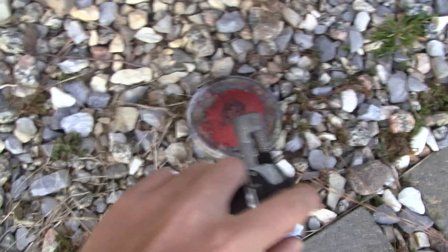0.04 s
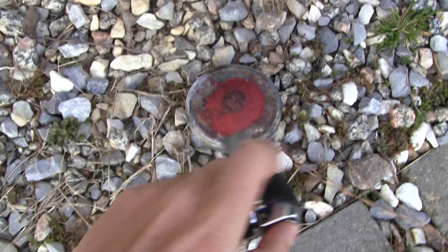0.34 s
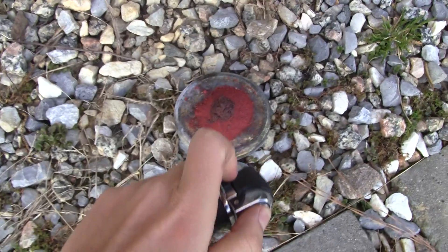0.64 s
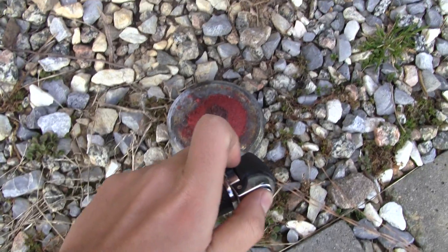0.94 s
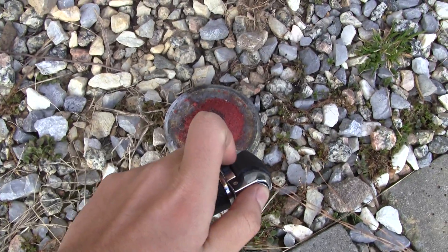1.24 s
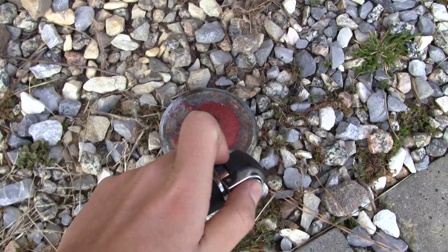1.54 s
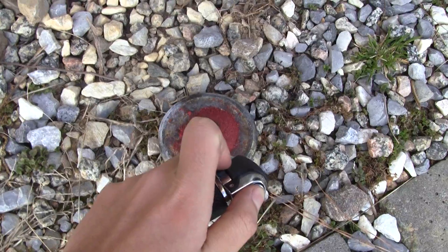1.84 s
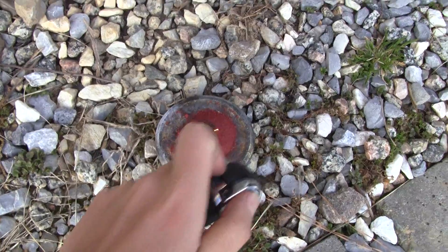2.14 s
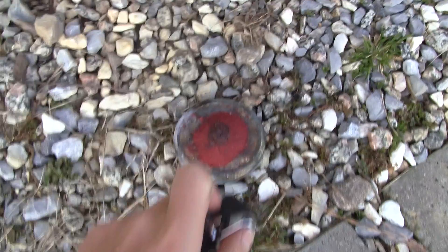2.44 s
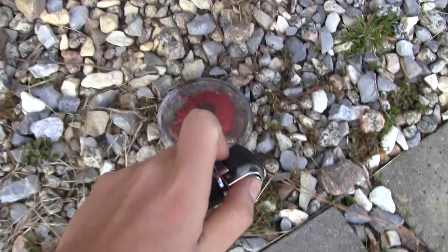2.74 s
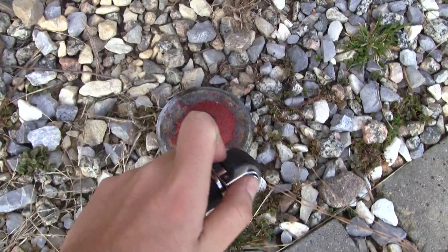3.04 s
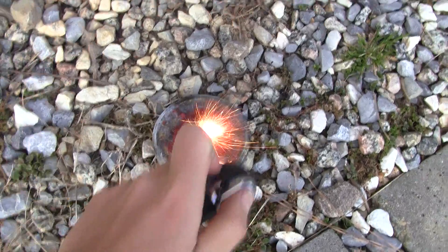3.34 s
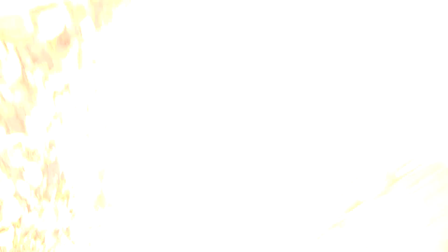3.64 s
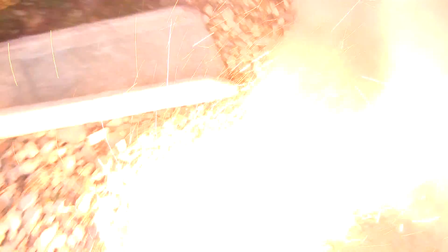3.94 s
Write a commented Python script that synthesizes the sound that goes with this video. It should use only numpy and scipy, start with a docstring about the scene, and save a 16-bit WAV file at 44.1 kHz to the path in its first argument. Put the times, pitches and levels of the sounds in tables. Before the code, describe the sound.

A loud hissing roar of burning powder erupts outdoors after a lighter rumbles and clicks.

```python
"""The low, fluttering rumble of a jet lighter's flame comes first, with its thin hiss, ticks and clicks.
The hiss is turbulent gas, its treble swept by a ground reflection. After dull bumps and a hollow
knock, a small dish of thermite powder on gravel outdoors, near the microphone, spits, catches with a roar
and burns on as a bright jet, crackling as single grains burst. One sharp pop makes the limiter duck."""
import sys
import numpy as np
from scipy import signal
from scipy.fft import rfft, irfft, next_fast_len
from scipy.io import wavfile
from scipy.ndimage import map_coordinates

SR = 44100
rng = np.random.default_rng(int(sys.argv[2]) if len(sys.argv) > 2 else 0)


def waveform_to_disk(signal):
    """Save audio, clipped to [-1, 1], as 16-bit WAV at the path in sys.argv[1]."""
    frames = np.transpose(np.atleast_2d(signal))
    scaled = np.clip(frames, -1, 1) * 32767
    samples = np.round(scaled).astype(np.int16)
    wavfile.write(sys.argv[1], SR, samples)


N = 176400
T = np.arange(N) / SR

# Spectra of the sources. Each row: frequency in Hz, relative level in dB.
RUMBLE_SPECTRUM = [(25, -33), (50, -20), (80, -14), (110, -7), (150, -7), (180, -4), (350, -1.5),
                   (450, -0.5), (580, -3), (860, -7), (1070, -8.5), (1330, -19), (1850, -19), (2250, -29),
                   (2900, -32), (3600, -40), (16000, -62)]
HISS_SPECTRUM = [(1500, -16), (3500, -13), (5000, -8), (5600, -4), (7000, -4), (8300, 3), (10300, 3.5),
                 (11500, -3), (13000, -9), (16000, -20)]
TICK_SPECTRUM = [(800, -15), (2500, -4), (4500, 0), (6000, -2), (8000, -10), (16000, -18)]
SPUTTER_SPECTRUM = [(800, -20), (1800, 2), (2300, -3), (3000, 0), (3900, -13), (5800, -9), (7500, -22),
                    (16000, -35)]
CLICK_SPECTRUM = [(500, -28), (1300, -18), (1800, 0), (2900, 1), (3800, -2), (4800, -11), (5600, 0),
                  (7500, -1.5), (9500, 2), (12500, -2.5), (16000, -14.5)]
FLARE_SPECTRUM = [(47, -48), (80, -24), (146, -8.5), (186, -12), (237, -4.5), (303, -8.5), (346, -1.5),
                  (422, -8), (451, -4.5), (575, -2.5), (734, -9.5), (1070, -5), (1460, -18), (1860, -1),
                  (2040, -10), (2660, -7.5), (2900, -9), (3620, -10.5), (4520, -14.5), (6170, -10.5),
                  (7200, -10.5), (9610, -2.5), (11200, -4), (13100, -6), (16000, -20.5)]  # while the powder catches
BURN_SPECTRUM = [(47, -51), (80, -16), (146, -6.5), (178, -9), (248, -3), (323, -8.5), (395, -2),
                 (515, -6.5), (629, -0.5), (917, -5), (1120, 0.5), (1670, -11), (2040, -4.5), (2780, -3),
                 (3100, -4), (3790, -0.5), (4830, -0.5), (7200, -6.5), (11000, -1.5), (14600, -9.5),
                 (16000, -15)]  # once the whole dish burns
POP_SPECTRUM = [(200, -15), (900, 9), (2000, 4), (4000, 2), (8000, 4), (16000, -7)]
# A wide and a narrow stereo image. Each row: frequency in Hz, side minus mid in dB.
WIDE_IMAGE = [(40, -11), (120, -10), (300, -15), (900, -16), (3000, -8), (4400, -20), (6000, -13),
              (9000, -11), (13000, -4)]
NARROW_IMAGE = [(100, -14), (400, -22), (1000, -29), (1700, -50), (4700, -50), (5500, -28), (8000, -14),
                (11000, -9), (15000, -7)]
# Envelopes of the lighter's rumble and hiss. Each row: time in seconds, relative level in dB.
RUMBLE_ENVELOPE = [(0.0, -46.5), (0.49, -45.5), (0.53, -48), (0.54, -44), (1.27, -45), (1.42, -42.5),
                   (1.57, -45.5), (1.99, -40), (2.43, -44), (2.44, -51.5), (2.51, -41.5), (2.98, -42.5),
                   (3.04, -37.5), (3.05, -49), (3.1, -39.5), (3.17, -40)]
HISS_ENVELOPE = [(0, -59), (.3, -58.5), (.55, -61.5), (1.5, -62.5), (1.9, -60), (2.3, -58), (2.6, -60),
                 (3.3, -61)]
# Faint hums. Each row: frequency in Hz, envelope as above.
FAINT_HUMS = [(112, [(0, -68), (2.1, -58), (2.28, -49), (2.4, -46), (2.55, -58), (2.66, -57), (2.75, -46),
              (2.95, -48), (3.3, -50), (4, -56)]), (448, [(0, -55), (.3, -52), (1.0, -55), (1.3, -68)])]
# Narrow bands in the hiss. Each row: centre in Hz, width in Hz, envelope as above.
WHISTLES = [(1310, 260, [(0, -54), (.35, -52), (.5, -66), (3.3, -72)]), (1800, 380, [(0, -70), (.65, -65),
            (1.2, -57), (2.2, -57), (2.44, -68), (2.55, -56), (3.3, -58)]), (4435, 240, [(0, -58),
            (.3, -58.5), (.39, -71), (.55, -62), (1.1, -58), (1.7, -59.5), (2.2, -63), (2.5, -69),
            (2.9, -61), (3.3, -62)]), (10000, 530, [(0, -62), (.5, -62), (1.0, -58), (1.5, -59), (1.7, -66),
            (2.5, -61), (2.8, -57.5), (3.3, -61)]), (9570, 700, [(0, -75), (1.5, -74), (1.7, -60),
            (2.1, -54.5), (2.35, -69), (2.8, -65), (3.0, -57.5), (3.3, -53)])]
# Lag of the ground reflection as the hand moves. Each row: time in seconds, delay in ms.
GROUND_DELAY = [(0, 1.29), (.27, 1.3), (.48, 1.21), (1.4, 1.195), (1.65, 1.23), (2.18, 1.235), (2.46, 1.38),
                (2.85, 1.2), (3.3, 1.23)]
# Sputters of the gas jet. Each row: start in seconds, length in seconds, level in dB.
JET_SPUTTERS = [(.555, .055, -60), (.725, .095, -53), (.86, .035, -59), (1.038, .04, -57),
                (1.115, .05, -61), (1.268, .08, -58), (1.735, .04, -61), (2.505, .115, -58)]
# Impulsive events. Each row: start in seconds, relative level in dB.
LIGHTER_TICKS = [(.02, -40), (.0955, -38), (.3095, -29), (.4375, -43), (2.5175, -35), (2.5485, -39),
                 (2.5985, -35), (3.1785, -31), (3.2105, -27)]
MICROPHONE_BUMPS = [(1.015, -41), (1.665, -38), (1.78, -41), (2.298, -29), (2.405, -41), (2.44, -41)]
LIGHTER_CLICKS = [(1.928, -33), (1.941, -32), (2.0262, -33), (2.0285, -10.5), (2.0345, -27), (2.0578, -17),
                  (2.0668, -19), (2.0676, -13.5), (2.0694, -11), (2.0724, -12.5), (2.0776, -21),
                  (2.0802, -27), (2.1092, -23), (2.1133, -23), (2.1148, -21), (2.1418, -33),
                  (2.1615, -22.5), (3.2252, -19), (3.228, -25), (3.2328, -13), (3.2342, -16), (3.239, -21),
                  (3.2436, -13.5), (3.2455, -11), (3.2485, -20), (3.2602, -21), (3.2622, -18.5)]
POWDER_SPITS = [(3.3195, -20), (3.3235, -19), (3.327, -17), (3.333, -9), (3.3375, -17), (3.3445, -21),
                (3.3475, -9.5), (3.3528, -8), (3.358, -14), (3.3705, -10), (3.3815, -5), (3.3955, -8),
                (3.4135, -4), (3.4148, -3), (3.4705, -10), (3.616, -8), (3.626, -9), (3.9265, -2)]
# Damped modes. Each row: frequency in Hz, relative level in dB, seconds to decay by 60 dB.
BUMP_RESONANCES = [(55, -6, .14), (105, 1, 0.13), (198, -3.5, .05)]
KNOCK_RESONANCES = [(175, -3, 0.12), (346, -0.5, 0.077), (555, -8.5, 0.077), (778, -19, 0.064)]
# Edges of the powder flame's four bands, in Hz.
FLAME_BAND_EDGES = [120, 900, 3000, 7500, 17000]
# Its envelopes. Each row: time in seconds, relative levels in dB of roar, middle, upper middle, treble.
FLAME_ENVELOPES = [(3.312, -69.5, -65, -63, -62), (3.325, -47, -40.5, -38, -33),
                   (3.365, -42, -40, -36.5, -30.5), (3.394, -34, -28, -27.5, -20),
                   (3.426, -38, -25, -26.5, -17.5), (3.448, -20.5, -22.5, -22, -16),
                   (3.522, -22, -24, -20.5, -18), (3.57, -28, -27.5, -21.5, -15.5),
                   (3.622, -33, -31, -24, -18), (3.64, -33.5, -30, -26.5, -21),
                   (3.696, -31, -30.5, -28, -22), (3.735, -35.5, -30.5, -25, -21.5),
                   (3.762, -35, -28.5, -25.5, -19), (3.862, -31.5, -29.5, -24.5, -20),
                   (3.9, -32, -28.5, -23, -21.5), (3.95, -32, -28.5, -24, -21),
                   (4.0, -32, -30.5, -23, -18.5)]
# Imbalance of the microphone ports. Each row: frequency in Hz, left minus right in dB.
PORT_IMBALANCE = [(7500, 0), (8700, -1), (10200, -3.4), (11300, -1), (12200, 2), (13200, 1.3), (14200, 0)]


def from_db(db):
    """Decibels to amplitude ratio."""
    return 10 ** (np.asarray(db) / 20)


def unit_rms(x):
    """Normalise to unit mean power."""
    return x / np.sqrt(np.mean(x ** 2) + 1e-20)


def in_time(rows):
    """Linear interpolation of each column over time."""
    times, *columns = np.transpose(rows)
    return [np.interp(T, times, column) for column in columns]


def colour(x, spectrum):
    """Minimum-phase filter: folding the cepstrum makes the response causal."""
    size = 2 * next_fast_len(N // 2 + SR // 10)
    hz, db = np.transpose(spectrum)
    bin_hz = np.arange(size // 2 + 1) * SR / size
    log_gain = np.interp(np.log(bin_hz + 1), np.log(hz), np.log(from_db(db)))
    cepstrum = irfft(log_gain)[:size // 2]
    cepstrum[1:] *= 2
    return irfft(rfft(x, size) * np.exp(rfft(cepstrum, size)))[..., :N]


def band(x, low, high, order=2):
    """Butterworth band-pass."""
    return signal.sosfilt(signal.butter(order, [low, high], "band", fs=SR, output="sos"), x)


def drift(corner_hz):
    """Slow random modulation: low-passed noise of unit rms."""
    hop, settle = 40, 2000
    pole = np.exp(-2 * np.pi * hop * corner_hz / SR)
    noise = rng.standard_normal(N // hop + settle + 2)
    slow = signal.lfilter([1], [1, -2 * pole, pole * pole], noise)[settle:]
    return np.interp(np.arange(N) / hop, np.arange(len(slow)), unit_rms(slow))


def stereo(mid, side, width):
    """Mid-side stereo: an uncorrelated side signal in antiphase gives width."""
    return mid + colour(side, width) * np.array([[1], [-1]])


def wide_noise():
    """Partly correlated channels give white noise a wide image."""
    return stereo(*rng.standard_normal((2, N)), WIDE_IMAGE)


def impulses(rows):
    """One impulse per event."""
    out = np.zeros(N)
    for start, db in rows:
        out[int(start * SR)] += from_db(db)
    return out


def snaps(rows, spectrum, scatter_db, t60_s):
    """Scattering off the stones gives each sharp crack a decaying tail of noise."""
    size = SR // 20
    tails = np.zeros((2, N + size))
    decay = from_db(-60 * T[:size] / t60_s)
    decay /= np.linalg.norm(decay)
    for start, db in rows:
        i = int(start * SR)
        tails[:, i:i + size] += from_db(db + scatter_db) * rng.standard_normal((2, size)) * decay
    cracks = stereo(impulses(rows) + tails[0, :N], tails[1, :N], NARROW_IMAGE)
    filter_peak = np.abs(colour(impulses([(0, 0)]), spectrum)).max()
    return colour(cracks, spectrum) / filter_peak


def thud(rows, modes, rise_s):
    """Modal vibration: a softly struck body rings as a sum of damped sinusoids."""
    t = T[:SR // 2]
    ring = sum(from_db(db - 60 * t / t60) * np.sin(2 * np.pi * hz * t) for hz, db, t60 in modes)
    onset = 1 - np.exp(-t / rise_s)
    return signal.fftconvolve(impulses(rows), ring * onset)[:N]


def sizzle(grain_share, grains_per_s=6000, spread_db=3):
    """Shot noise from tiny bursts and the noise of rushing gas add in power."""
    sizes = from_db(spread_db * np.minimum(rng.exponential(1, (2, N)), 4))
    signs = rng.choice([-1, 1], (2, N))
    bursts = rng.random((2, N)) < grains_per_s / SR
    grains = np.sqrt(grain_share) * unit_rms(sizes * signs * bursts)
    gas = np.sqrt(1 - grain_share) * rng.standard_normal((2, N))
    return stereo(*(grains + gas), NARROW_IMAGE)


def lighter_flame_rumble(gain_db=3.32, flutter_db=1.44, waver=.012):
    """Combustion noise: the lighter's flame rumbles and flutters, over faint wavering hums."""
    gain = from_db(gain_db + in_time(RUMBLE_ENVELOPE)[0] + flutter_db * drift(26))
    out = gain * unit_rms(colour(wide_noise(), RUMBLE_SPECTRUM))
    for hz, envelope in FAINT_HUMS:
        pitch_hz = hz * (1 + waver * drift(6.1))
        hum = np.sin(2 * np.pi * np.cumsum(pitch_hz) / SR)
        out += from_db(in_time(envelope)[0]) * unit_rms(hum)
    return out


def gas_jet(whistle_db=-1.5):
    """Turbulence in the lighter's jet radiates a thin hiss with narrow, airy whistles."""
    out = from_db(in_time(HISS_ENVELOPE)[0]) * unit_rms(colour(wide_noise(), HISS_SPECTRUM))
    for hz, width, envelope in WHISTLES:
        whistle = unit_rms(band(wide_noise(), hz - width / 2, hz + width / 2))
        out += from_db(whistle_db + in_time(envelope)[0]) * whistle
    return out


def with_ground_echo(direct, gain=.8, above_hz=5500):
    """Interference with a reflection of changing delay sweeps a comb filter through the treble."""
    treble = signal.sosfiltfilt(signal.butter(3, above_hz, "high", fs=SR, output="sos"), direct)
    earlier = (T - in_time(GROUND_DELAY)[0] / 1000) * SR
    echo = np.array([map_coordinates(x, [earlier], order=3) for x in treble])
    return direct + gain * echo


def ticks():
    """Light impacts of the lighter in the hand radiate soft ticks."""
    return snaps(LIGHTER_TICKS, TICK_SPECTRUM, scatter_db=0, t60_s=.02)


def sputters():
    """Amplitude modulation: the lighter's jet sputters in half-sine swells of grainy noise."""
    swells = sum(from_db(db) * np.sin(np.pi * np.clip((T - start) / length, 0, 1))
                 for start, length, db in JET_SPUTTERS)
    return swells * unit_rms(colour(sizzle(grain_share=.5), SPUTTER_SPECTRUM))


def bumps():
    """Dull blows on the microphone excite its low modes."""
    return thud(MICROPHONE_BUMPS, BUMP_RESONANCES, rise_s=.0049)


def clicks():
    """Brief impulses have broad spectra: the lighter clicks in dry, bright runs."""
    return from_db(2) * snaps(LIGHTER_CLICKS, CLICK_SPECTRUM, scatter_db=-4, t60_s=.013)


def knock(start_s=3.2795, gain_db=-10):
    """Damped resonance: one hollow knock just before the powder catches."""
    return thud([(start_s, gain_db)], KNOCK_RESONANCES, rise_s=.012)


def powder_flame(spread_at_s=3.55, spread_lasts_s=.08, gain_db=.5, flutter_db=.8):
    """Combustion noise: a crackling flare spreads into a smoother jet; the roar swells and recedes."""
    flare = colour(sizzle(grain_share=.6), FLARE_SPECTRUM)
    burn = colour(sizzle(grain_share=.36), BURN_SPECTRUM)
    spread = np.clip((T - spread_at_s) / spread_lasts_s + .5, 0, 1)
    flutter = flutter_db * drift(49)
    out = np.zeros((2, N))
    for db, low, high in zip(in_time(FLAME_ENVELOPES), FLAME_BAND_EDGES, FLAME_BAND_EDGES[1:]):
        early, late = (unit_rms(band(x, low, high, order=5)) for x in (flare, burn))
        blend = np.sqrt(1 - spread) * early + np.sqrt(spread) * late
        out += from_db(gain_db + db + flutter) * blend
    return out


def spits():
    """Each spark spat out by the powder radiates a pressure pulse."""
    return from_db(2.5) * snaps(POWDER_SPITS, FLARE_SPECTRUM, scatter_db=-3.5, t60_s=.011)


def pop(start_s=3.8845, level_db=6):
    """One strong pressure pulse from the melt is heard as a sharp pop."""
    return snaps([(start_s, level_db)], POP_SPECTRUM, scatter_db=-11, t60_s=.008)


def scene():
    """Superposition at the microphone, whose two ports colour the treble differently."""
    sound = lighter_flame_rumble() + with_ground_echo(gas_jet()) + sputters() + clicks() + ticks()
    sound += bumps() + knock() + spits() + pop() + powder_flame()
    return np.array([colour(channel, np.array(PORT_IMBALANCE) * [1, share])
                     for channel, share in zip(sound, (.5, -.5))])


def record(dry, limit_db=-1, attack_s=.001, recover_db_per_s=32.5, cutoff_hz=15750):
    """Peak limiting: gain falls fast and recovers slowly; overshoot clips; a low-pass cuts the top."""
    peak_db = 20 * np.log10(np.abs(dry).max(axis=0) + 1e-9)
    over_db = np.maximum(peak_db - limit_db, 0)
    held_db = np.maximum.accumulate(over_db + recover_db_per_s * T) - recover_db_per_s * T
    pole = np.exp(-1 / (attack_s * SR))
    duck_db = signal.lfilter([1 - pole], [1, -pole], held_db)
    limited = np.clip(dry * from_db(-duck_db), -1, 1)
    return signal.sosfilt(signal.ellip(12, .1, 80, cutoff_hz, fs=SR, output="sos"), limited)


dry = scene()
out = record(dry)
waveform_to_disk(out)
```